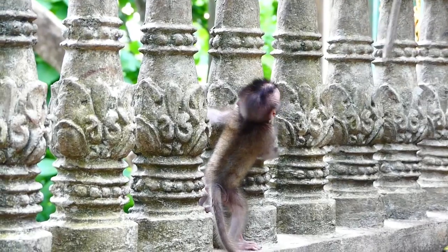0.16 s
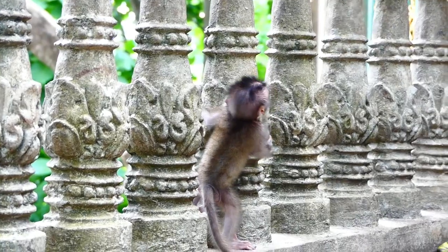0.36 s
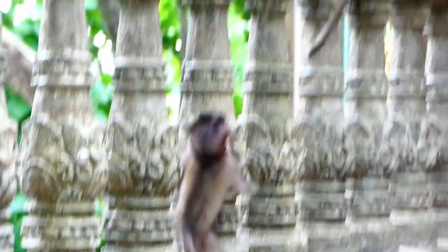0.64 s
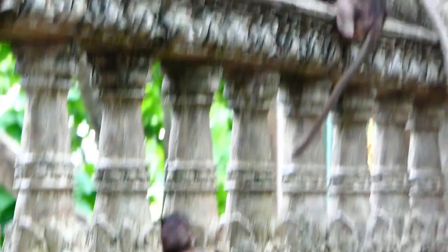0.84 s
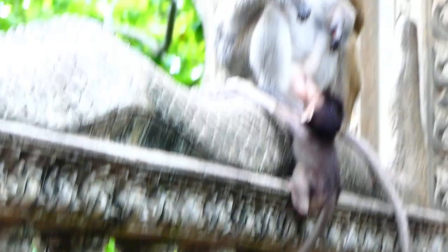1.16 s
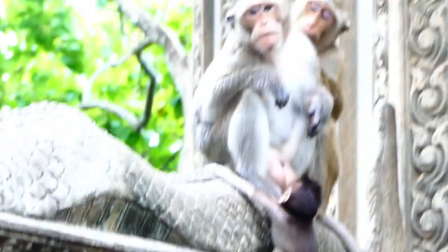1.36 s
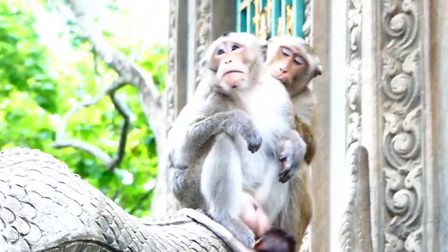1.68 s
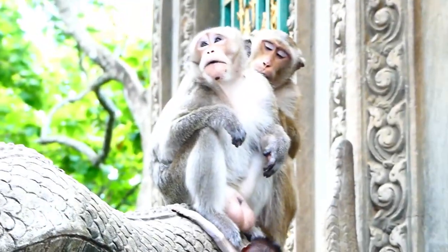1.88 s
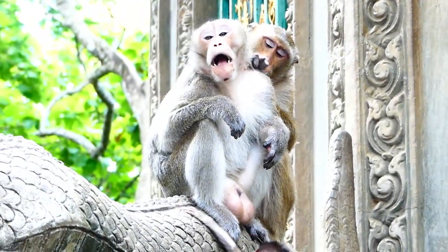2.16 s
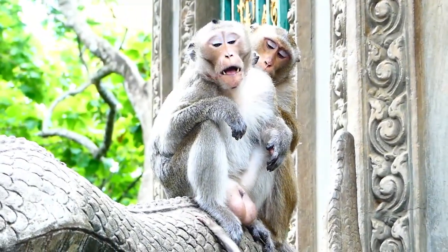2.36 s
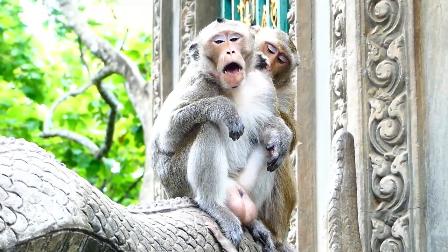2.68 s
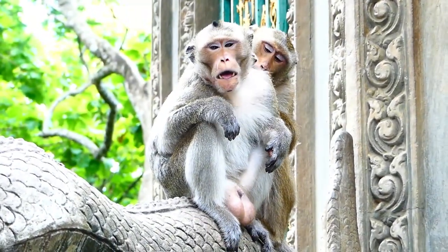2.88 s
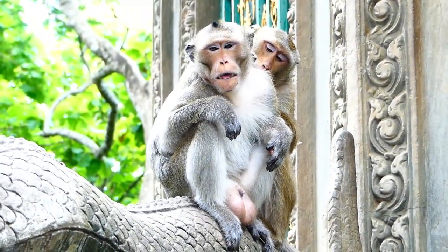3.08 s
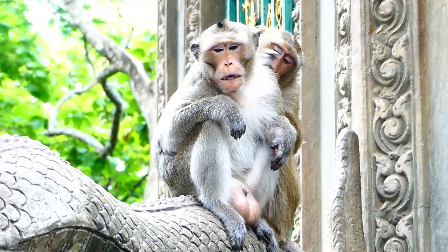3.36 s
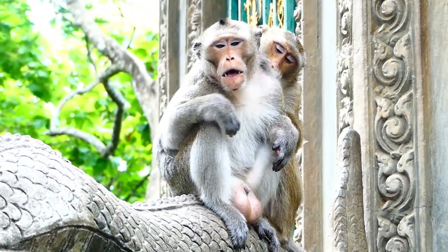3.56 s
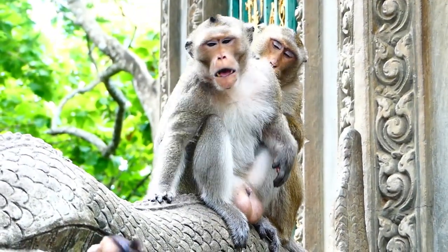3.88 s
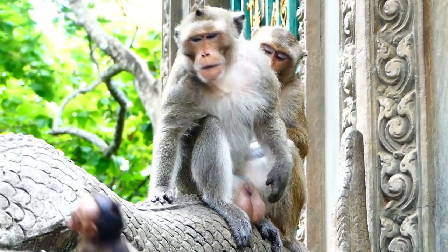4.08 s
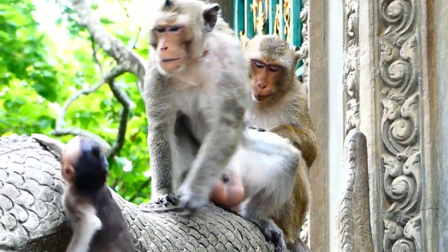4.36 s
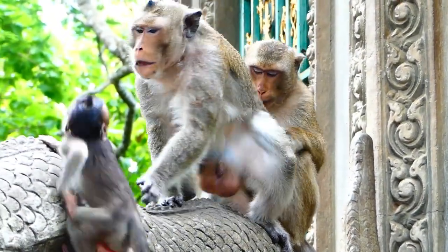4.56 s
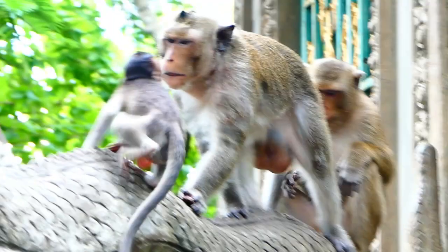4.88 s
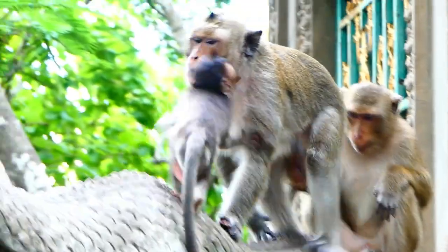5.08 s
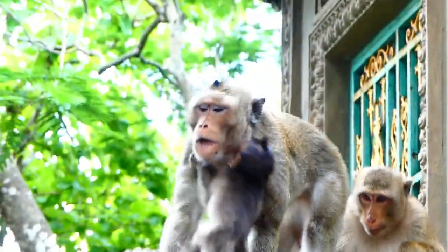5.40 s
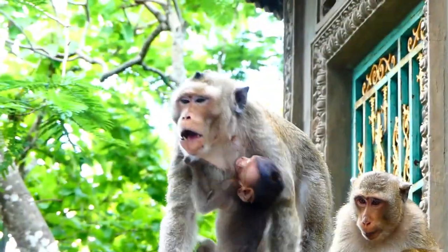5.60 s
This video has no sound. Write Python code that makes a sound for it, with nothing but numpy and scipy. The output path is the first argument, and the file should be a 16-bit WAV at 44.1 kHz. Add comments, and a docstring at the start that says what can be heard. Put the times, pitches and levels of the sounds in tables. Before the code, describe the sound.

Close outdoor capture of a baby monkey among stone walls. Quick yips and hoarse rasps lead into two overlapping shrill squeals, then an arched squeal and a plunging one. After a pause with a soft coo come a short squeal, a longer falling one and a last scream with a thin whistle outlasting it. Faint scuffs on stone, distant murmur and short reflections surround the calls.

```python
"""A baby macaque screams among stone walls, over a quiet outdoor murmur that runs throughout.
Yips and rasps open, then two overlapping squeals, as if its two vocal folds vibrate apart at two pitches.
An arched squeal runs into a plunging one; after a pause come a short squeal, a falling one and a last one.
A thin whistle of one fold overlaps the last squeal and outlives it; small yips, a rasp and a scuff close.
Soft coos and scuffs on stone lie between and beneath; reflections and a short tail surround every call."""
import sys
import numpy as np
from scipy import signal
from scipy.fft import rfft, irfft, next_fast_len
from scipy.io import wavfile

SR = 44100
rng = np.random.default_rng(int(sys.argv[2]) if len(sys.argv) > 2 else 0)


def wrap_up_sound(samples):
    """Save the sound to the file named by the first command line argument, as 16-bit audio."""
    columns = np.atleast_2d(samples).T
    # keep every value between -1 and 1, then stretch to whole-number steps
    tamed = np.clip(columns, -1, 1)
    steps = np.round(tamed * 32767).astype(np.int16)
    wavfile.write(sys.argv[1], SR, steps)


N = 252693
T = np.arange(N) / SR


def undb(db):
    """Decibels to gain."""
    return 10 ** (np.asarray(db) / 20)


def curves(rows):
    """The columns of a table, joined by straight lines in time."""
    s, *columns = np.transpose(rows)
    return [np.interp(T, s, c) for c in columns]


def gate(start, end):
    """One between two times, with soft edges."""
    fade_s = .007
    opening = np.clip((T - start) / fade_s + .5, 0, 1)
    closing = np.clip((end - T) / fade_s + .5, 0, 1)
    return opening * closing


def shape(x, points):
    """A sound passed through a spectrum of (Hz, dB) points, joined over log frequency."""
    size = next_fast_len(N)
    f = np.maximum(np.arange(size // 2 + 1) * SR / size, 1)
    hz, db = np.transpose(points)
    gain = undb(np.interp(np.log(f), np.log(hz), db))
    return irfft(rfft(x, size) * gain, size)[:N]


def noise(points):
    """Unit noise with a spectrum of (Hz, dB) points."""
    x = shape(rng.standard_normal(N), points)
    return x / x.std()


def wander(rate):
    """A random drift with a new target rate times a second, scaled to unit spread."""
    steps = rng.standard_normal(N // 4)
    x = np.interp(T * rate, np.arange(len(steps)), steps)
    return x / x.std()


def butter(x, order, hz, kind="low"):
    """A smooth low or high cut at a corner in Hz."""
    return signal.sosfilt(signal.butter(order, hz, kind, fs=SR, output="sos"), x)


# Colour of the outdoor murmur. Each row: frequency in Hz, relative density in dB per Hz.
AIR = [(18, -49), (30, -16), (240, 2.5), (304, -1), (538, -4), (774, -1.5), (859, -4), (1170, -2),
       (2030, -22.5), (15000, -53.5)]
# Slow swell of the murmur. Each row: time in seconds, level in dB.
AIR_LEVEL = [(.3, -84.5), (.6, -91), (2.3, -76), (3.1, -83.5), (4.6, -84), (5.7, -74)]
HUM_HZ, HUM_DB = 303, -88.5


def air():
    """Distant murmur of traffic and leaves: coloured noise, spread in stereo, with a faint steady hum."""
    mid = noise(AIR) * undb(wander(9))
    side = noise(AIR) * undb(wander(9))
    side = shape(side, [(40, -3), (170, -6), (1000, -3.5)])
    murmur = mid + side * np.array([[1], [-1]])
    hum = undb(HUM_DB) * np.sin(2 * np.pi * HUM_HZ * T)
    return undb(curves(AIR_LEVEL)[0]) * murmur + hum


ECHO_T60_S, ECHO_TREBLE_T60_S = 0.3, 0.28  # time to fall 60 dB


def terrace(x, direct_db=-2, early_db=-7, tail_db=-10, early_s=0.0094,
            side_db=-7, treble_side_db=-8, pan_db=-0.44):
    """Direct sound, quick reflections from near stone, then a tail that loses its treble first."""
    t = T[:int(.7 * SR)]
    mid, side = rng.standard_normal((2, len(t)))
    treble_side = butter(side[::-1], 4, 11000, "high")
    width = undb(side_db) * side + undb(treble_side_db) * treble_side
    scatter = mid + width * np.array([[1], [-1]])
    low = butter(scatter, 2, 6000)
    high = butter(scatter[:, ::-1], 2, 6000, "high")  # reversed noise gives the treble its own pattern
    tail = low * undb(-60 * t / ECHO_T60_S) + high * undb(-60 * t / ECHO_TREBLE_T60_S)
    tail = tail * np.minimum(t / 0.032, 1)  # builds up over 32 ms
    early = scatter * np.exp(-t / early_s) * (t > .002)
    response = sum(undb(db) * part / np.linalg.norm(part[0])
                   for db, part in ((early_db, early), (tail_db, tail)))
    echo = signal.fftconvolve(x[None], response, axes=1)[:, :N]
    pan = undb(np.array([[pan_db], [-pan_db]]) / 2)  # negative leans right
    return (undb(direct_db) * x + echo) * pan


# Hands, feet and fur on stone. Each row: middle in seconds, half length in seconds, level in dB,
# centre in Hz.
SCUFFS = [(.07, 0.13, -61.5, 1300), (0.237, 0.02, -76, 1400), (2.329, 0.018, -64, 2280),
          (2.786, 0.049, -55, 1337), (3.846, 0.14, -63.5, 1200), (4.827, 0.064, -70, 1296),
          (5.102, 0.23, -77.5, 1070), (5.687, 0.057, -48.5, 1350)]


def scuffs(grain_db=3):
    """Soft swells of grainy rubbing: bands of noise whose level flickers."""
    out = 0
    for s, half, db, hz in SCUFFS:
        rub = noise([(hz / 40, -50), (hz / 10, -15), (hz / 3, -14), (hz * 0.55, 0),
                     (hz * 1.4, -6), (hz * 3, -20), (hz * 8, -48)])
        out = out + undb(db) * rub * np.exp(-((T - s) / half) ** 2)
    return out * undb(grain_db * wander(150))


# Soft calls of the other monkeys. Each row: start in seconds, length in seconds, pitch in Hz, glide in Hz,
# arch in Hz, peak level in dB, overtones in dB, waver in radians.
COOS = [(.88, .29, 1320, -20, 20, -79.5, -12, .1), (1.15, .36, 1285, -55, 0, -64, -18, .12),
        (2.265, .18, 631, 18, -1, -49, -7, .1), (3.5, .28, 590, 50, 110, -67, -5, .1),
        (4.76, .11, 1120, 0, 0, -65, -12, 1.8), (4.99, .16, 1050, 50, 0, -68, -14, 1.8),
        (5.38, .17, 1260, 40, 0, -65, -16, 1.6)]
# Blend of a coo's harmonics. Each row: multiple of the pitch, relative level in dB.
COO_HARMONICS = [(1, 0), (2, -9), (3, -13), (4, -19), (5, -30.5), (6, -48)]
COO_EDGE_DB = 9  # a coo swells to its middle from this far below


def coos(waver_rate=170):
    """Relaxed calls with harmonics; pitch and level arch over each, and strong waver blurs a hoarse one."""
    out = 0
    for s, length, hz, glide_hz, arch_hz, db, overtones_db, waver in COOS:
        along = np.clip((T - s) / length, 0, 1)
        arch = 1 - (2 * along - 1) ** 2
        phase = 2 * np.pi * np.cumsum(hz + glide_hz * along + arch_hz * arch) / SR
        phase = phase + waver * (wander(waver_rate) + wander(2 * waver_rate))
        overtones = sum(undb(part_db) * np.sin(round(k) * phase)
                        for k, part_db in COO_HARMONICS[1:])  # the fundamental is added below
        tone = np.sqrt(2) * (np.sin(phase) + undb(overtones_db) * overtones)
        swell = undb(db - COO_EDGE_DB * (1 - arch))
        out = out + tone * swell * gate(s, s + length)
    return out


def fold(hz, rough, quaver=0.0051, quaver_rate=110, jitter_rate=1800):
    """Phase and strength of a vocal fold: it always quavers, and beats unevenly when hoarse."""
    jitter_hz = .075 * rough * np.sqrt(hz * 4000) * wander(jitter_rate)
    strength = np.abs(1 + .5 * rough * wander(600))
    pitch_hz = hz * (1 + quaver * wander(quaver_rate)) + jitter_hz
    return 2 * np.pi * np.cumsum(pitch_hz) / SR, np.sqrt(2) * strength


# Yips. Each row: start in seconds, length in seconds, start pitch in Hz, end pitch in Hz, level in dB,
# second harmonic in dB.
YIPS = [(0, 0.042, 1417, 988, -45, -10), (0.048, 0.036, 1000, 964, -57, 8),
        (0.088, 0.029, 1000, 2266, -45.5, -2.5), (0.133, 0.027, 1710, 1240, -44, -5.5),
        (0.899, 0.021, 3985, 3844, -50, -15), (1.128, 0.035, 1531, 3010, -49, -27),
        (1.372, 0.028, 1284, 1477, -56.5, -5.5), (1.707, 0.047, 2438, 1690, -47, -17),
        (1.856, 0.024, 1599, 1641, -63.5, 13.5), (2.393, .012, 1500, 1740, -44, -47),
        (3.725, 0.021, 1756, 2033, -43.5, -18), (3.826, 0.014, 1927, 1720, -43.5, -33),
        (3.976, 0.02, 1822, 3290, -47, 1.5), (4.28, .028, 2230, 1590, -58, -11),
        (4.538, .05, 2373, 1475, -56, 4), (4.752, 0.0935, 1847, 1820, -81, 13.5),
        (5.105, 0.048, 2885, 3224, -67.5, 12), (5.183, 0.014, 2530, 3033, -43.5, -11),
        (5.194, 0.025, 1896, 1477, -50.5, 5), (5.603, 0.025, 1722, 2980, -50, -48),
        (5.692, 0.0334, 3430, 3736, -54, 11.5)]


def yips(upper_db=-25, rough=0.32):
    """Brief low-pitched catches of the voice: gliding folds with a second and a fourth harmonic."""
    out = 0
    for s, length, start_hz, end_hz, db, second_db in YIPS:
        phase, strength = fold(np.interp(T, [s, s + length], [start_hz, end_hz]), rough)
        overtones = np.sin(2 * phase) + undb(upper_db) * np.sin(4 * phase)
        tone = np.sin(phase) + undb(second_db) * overtones
        out = out + undb(db) * tone * strength * gate(s, s + length)
    return out


# Hoarse rasps. Each row: start in seconds, length in seconds, pitch in Hz, starting level in dB,
# second harmonic in dB.
RASPS = [(0, 0.028, 1890, -48.5, 4), (0.11, 0.042, 2350, -46.5, -3.5), (0.199, 0.041, 2314, -36.5, -11),
         (0.251, 0.027, 2598, -36.5, -8.5), (1.156, 0.041, 2933, -43, -13), (1.276, 0.05, 3240, -56, -8),
         (1.672, 0.034, 4660, -50.5, -5), (1.494, .065, 3836, -50, -10.5), (1.574, .03, 2676, -57, 0),
         (3.561, 0.096, 2236, -44.5, -2), (4.494, 0.015, 4610, -69, -11), (5.634, 0.024, 2977, -44, -40)]
RASP_FADE_DB = 3  # each rasp weakens this much from start to end


def rasps(rough=0.82, spread_db=-5, upper_db=-17, half_db=-13):
    """Hoarse bursts from slack folds: alternate beats differ, and noise blurs each harmonic."""
    out = 0
    spread = 1 + undb(spread_db) * noise([(700, 22.5), (1400, -18.5), (2600, -12), (6000, -49.5), (12000, -74)])
    for s, length, hz, db, second_db in RASPS:
        phase, strength = fold(hz, rough)
        overtones = np.sin(2 * phase) + undb(upper_db) * np.sin(3 * phase)
        tone = np.sin(phase) + undb(second_db) * overtones
        alternate = 1 + 2 * undb(half_db) * np.sin(phase / 2 + wander(900))
        fade_db = RASP_FADE_DB * np.clip((T - s) / length, 0, 1)
        out = out + undb(db - fade_db) * tone * alternate * strength * gate(s, s + length)
    return out * spread


# The thin tone of one fold alone. Each row: time in seconds, pitch in Hz, level in dB.
WHISTLE = [(3.929, 10700, -47.5), (4.011, 10330, -43.5), (4.115, 11400, -38.5), (4.36, 11350, -46),
           (4.55, 10600, -51.5), (4.597, 9510, -42.5), (4.638, 10380, -46.5), (4.755, 10100, -43),
           (4.848, 10780, -45), (5.002, 10970, -46.5), (5.14, 11300, -39.5), (5.231, 10930, -40.5),
           (5.274, 8050, -43)]


def whistle(rough=0.03, lower_db=-32, upper_db=-24):
    """One fold sings a nearly pure top note; a beat at a third of its rate leaves faint, broken side tones."""
    hz, db = curves(WHISTLE)
    phase, strength = fold(hz, rough, quaver=0.0084)
    beat = phase / 3 + 1.3 * wander(700)
    sides = undb(lower_db) * np.sin(phase - beat) + undb(upper_db) * np.sin(phase + beat)
    tone = np.sin(phase) + sides * undb(4 * wander(25))
    tone = tone * undb(2.5 * wander(70))
    return tone * strength * undb(db) * gate(WHISTLE[0][0], WHISTLE[-1][0])


# The course of each squeal. Each row: time in seconds, central pitch in Hz, level in dB, roughness from 0 to 1.
OPENING = [(.285, 5160, -47, 0.4), (.315, 6930, -44, 1), (.36, 9000, -43, 0.1), (.4, 8880, -36.5, .5),
           (.43, 7910, -44, 0.55), (.62, 8970, -32.5, 0.3), (.755, 8360, -37.5, 0),
           (.777, 7280, -40.5, 0.37), (.8, 5230, -55, 0.16)]
LONG = [(.138, 9000, -51, .6), (.179, 10230, -46, 0.36), (.26, 8630, -44.5, 0.8), (.305, 10180, -41, 0.7),
        (.355, 10010, -37.5, 0.57), (.45, 9030, -35, 0.42), (.66, 9290, -42.5, 0.33),
        (.8, 8554, -37.5, .08), (.89, 7756, -34.5, 0.12), (.915, 6520, -42, 0.91)]
ARCH = [(1.151, 3996, -79, 0.61), (1.176, 5310, -48, 1), (1.216, 9220, -38.5, 0.32),
        (1.27, 9430, -34, 0.083), (1.36, 8700, -34.5, 0.18), (1.43, 7544, -40, 0.97),
        (1.545, 6370, -45, 0.97), (1.575, 5540, -53.5, 0.24), (1.604, 4670, -74.5, .45)]
PLUNGE = [(1.502, 9340, -48.5, 0.31), (1.547, 10260, -43, .3), (1.602, 9570, -49, 1),
          (1.639, 8380, -48.5, 1), (1.667, 7805, -38, 0.53), (1.683, 5224, -40, 1), (1.72, 4176, -38, 0.68),
          (1.745, 3907, -31.5, 0.15), (1.765, 3450, -74, .3)]
SHORT = [(2.451, 7840, -47, 0.056), (2.485, 8960, -66.5, 0.11), (2.504, 10150, -53, 0.017),
         (2.59, 10030, -48, 0.73), (2.64, 9975, -38.5, 0.057), (2.683, 9500, -44.5, 0.35),
         (2.732, 8300, -34, 0.057), (2.747, 6830, -34, 0.05), (2.763, 6110, -38, 0.22)]
FALLING = [(3.086, 9640, -50, .25), (3.12, 10080, -63.5, 0.91), (3.142, 10310, -44, 0.29),
           (3.299, 9870, -42, 0.39), (3.335, 9180, -36, .25), (3.45, 9207, -34, 0.19),
           (3.493, 8270, -33, 0.14), (3.52, 5530, -36.5, 0.39), (3.547, 3990, -34.5, 0.51),
           (3.575, 2760, -46, 0.43)]
LAST = [(3.89, 9530, -62, 0.19), (4., 9480, -51.5, 0.55), (4.1, 10050, -38.5, 0.32),
        (4.27, 9786, -38, 0.18), (4.42, 9500, -37.5, 0.33), (4.47, 7640, -39, 0.19),
        (4.497, 6270, -35, 0.89), (4.53, 4370, -36.5, 0.31), (4.555, 3857, -32.5, 0.18),
        (4.6, 2590, -65.5, 1)]
# The voice of each squeal, bands at full roughness before the throat colours them. Each row: course,
# half-pitch band in dB, one-and-a-half-pitch band in dB, bands at thirds of the pitch in dB.
SQUEALS = [(OPENING, -27.5, -10.5, -26), (LONG, -13.5, -5, -41.5), (ARCH, -24.5, -11.5, -10.5),
           (PLUNGE, 1, -1.18, -17.5), (SHORT, 0.39, -2, -42), (FALLING, -2.7, -1.3, -20.5),
           (LAST, 0.53, 0.74, -70)]
# Throat resonances that colour the side bands and hiss. Each row: frequency in Hz, gain in dB.
THROAT = [(1000, -29.5), (1900, -33.5), (2600, -26.5), (3300, -25), (3900, -1.5), (4500, 3), (5200, -1.5),
          (6000, 1.5), (7200, 1), (8500, -10), (10000, -5.5), (11300, 1), (13500, 2), (16000, -5)]
TAUT_HZ, SLACK_SCATTER = 8550, 0.09  # below this pitch the fold slackens and scatters in proportion


def squeal(call, lower_db, upper_db, thirds_db, rasp_db=-4, hiss_db=-16, third_low_db=-5,
           lower_slip=1.1, upper_slip=1.1, flutter_db=3, flutter_rate=120, wobble=.008, wobble_rate=45):
    """A shrill fold; as it roughens, every second or third beat differs, adding broad bands around its pitch."""
    hz, db, rough = curves(call)
    rough = np.clip(rough, 0, 1)
    slack = np.clip(1 - hz / TAUT_HZ, 0, 1)
    hz = hz * (1 + wobble * wander(wobble_rate) + SLACK_SCATTER * slack * wander(4 * flutter_rate))
    phase, strength = fold(hz, rough)

    # random phase slips smear the side tones into bands
    slow_slip = (lower_slip + .5 * rough) * wander(480)
    fast_slip = (upper_slip + rough) * wander(700)
    lower = undb(lower_db) * np.sin(phase / 2 + slow_slip)
    upper = undb(upper_db) * np.sin(1.5 * phase + fast_slip)
    beat = phase / 3 + slow_slip
    low_thirds = np.sin(phase - beat) + np.sin(beat)
    thirds = undb(thirds_db) * (np.sin(phase + beat) + undb(third_low_db) * low_thirds)

    # a hoarse voice spreads sidebands around each line, and air hisses past the folds
    spread = noise([(700, 8.5), (1400, -9), (2600, -28), (6000, -54), (12000, -84.5)])
    rasp = 1 + undb(rasp_db) * rough * spread
    hiss = noise([(1000, -18.5), (3200, 2), (4300, 0.5), (6200, 1),
                  (8500, 4.0), (11500, 11), (14000, 7.5), (16000, -4)])
    bands = (lower + upper + thirds) * rough * rasp + undb(hiss_db) * rough * hiss

    flutter = np.minimum(wander(flutter_rate), 1)  # the voice dips more than it surges
    level = undb(db + flutter_db * (1 - rough) * flutter)
    effort = strength * level * gate(call[0][0], call[-1][0])
    return np.sin(phase) * rasp * effort + shape(bands * effort, THROAT)


def scene():
    """The baby close by, the other monkeys around it, all among the same stone walls."""
    background = air()
    around = terrace(coos() + scuffs(), direct_db=-.5, early_db=-12, tail_db=-15, pan_db=-1.8)
    voice = yips() + rasps() + whistle() + sum(squeal(*row) for row in SQUEALS)
    baby = butter(voice, 4, 900, "high")  # the baby's voice carries little bass
    return background + around + terrace(baby)


TOP_HZ = 15700


def record(dry):
    """A steep low-pass removes the very top of the treble."""
    return signal.sosfilt(signal.ellip(10, .2, 80, TOP_HZ, fs=SR, output="sos"), dry)


dry = scene()
out = record(dry)
wrap_up_sound(out)
```